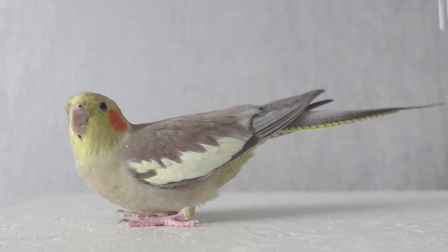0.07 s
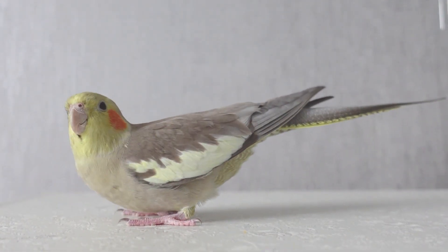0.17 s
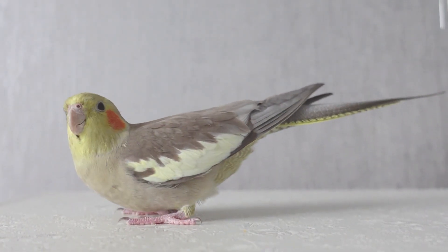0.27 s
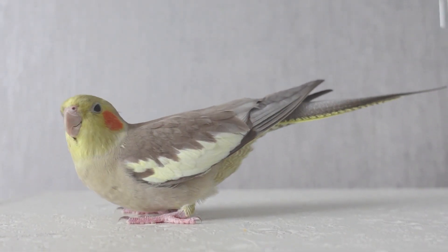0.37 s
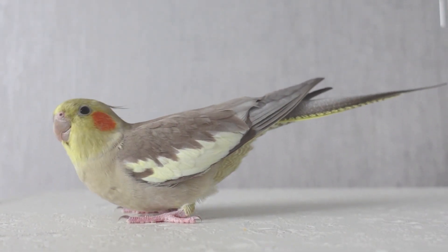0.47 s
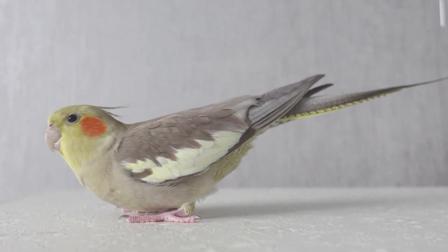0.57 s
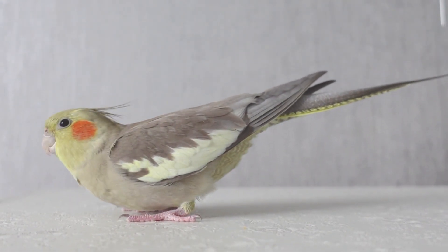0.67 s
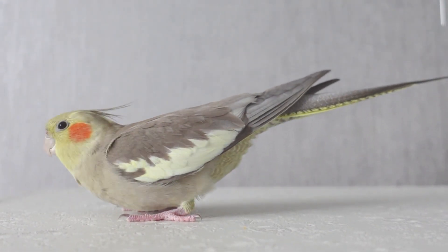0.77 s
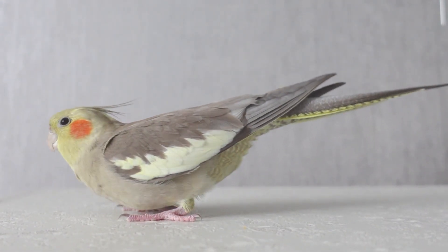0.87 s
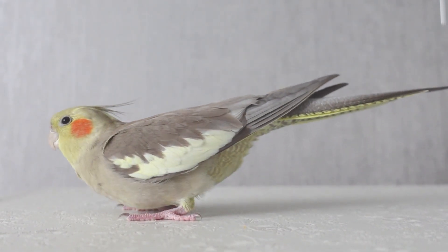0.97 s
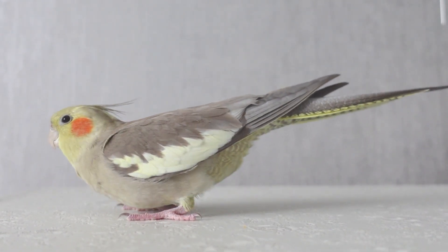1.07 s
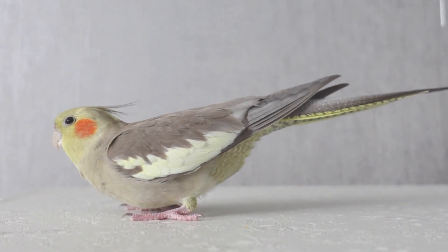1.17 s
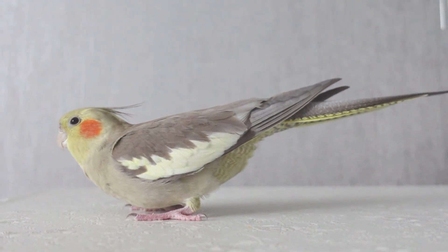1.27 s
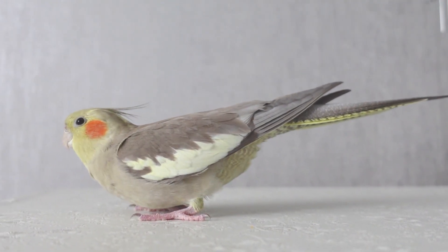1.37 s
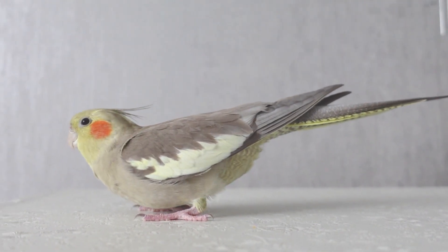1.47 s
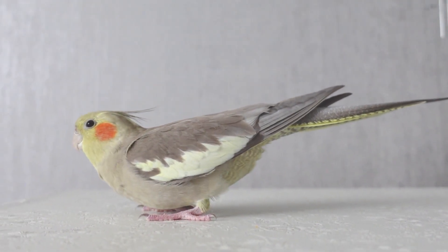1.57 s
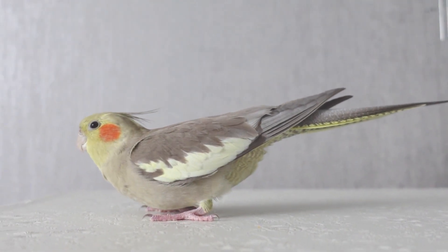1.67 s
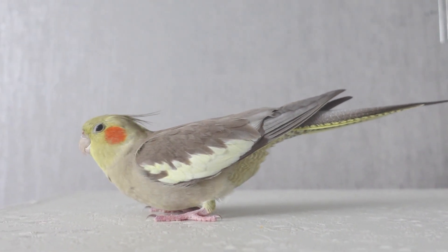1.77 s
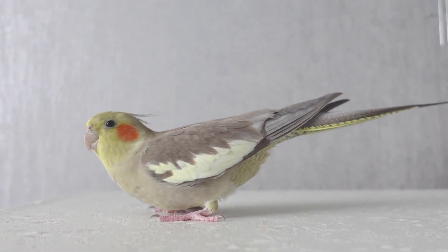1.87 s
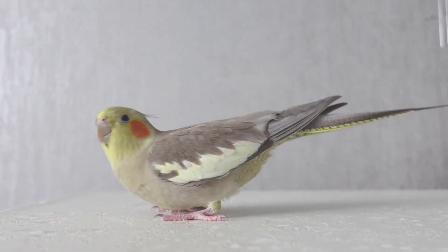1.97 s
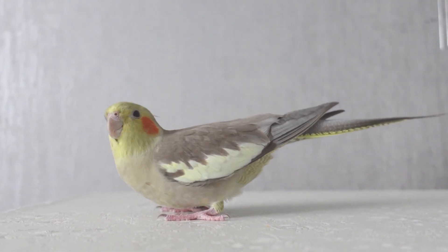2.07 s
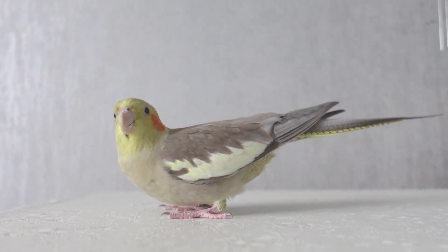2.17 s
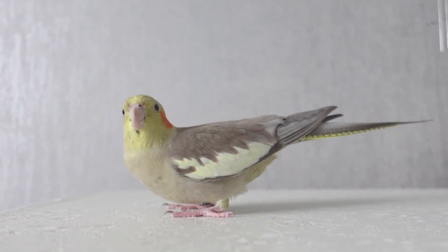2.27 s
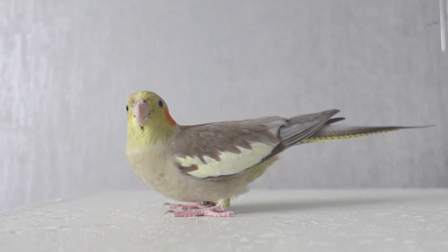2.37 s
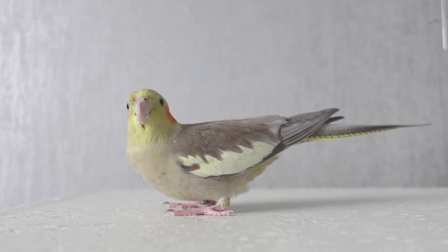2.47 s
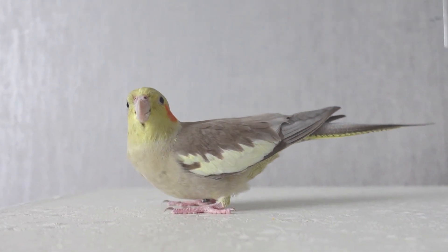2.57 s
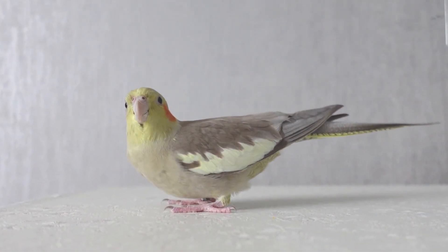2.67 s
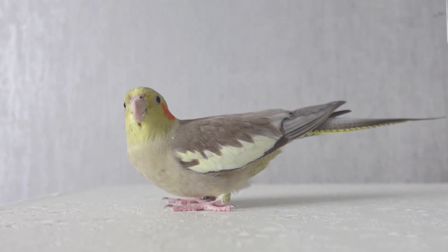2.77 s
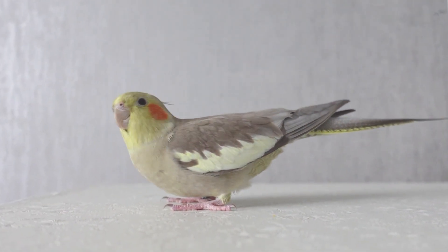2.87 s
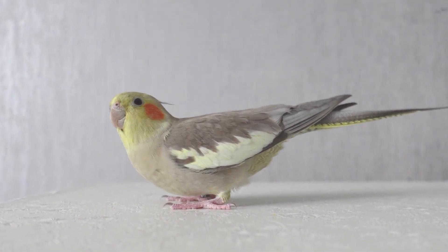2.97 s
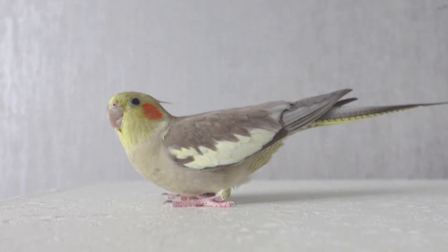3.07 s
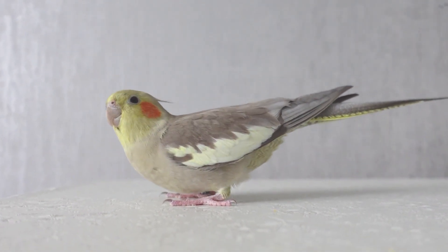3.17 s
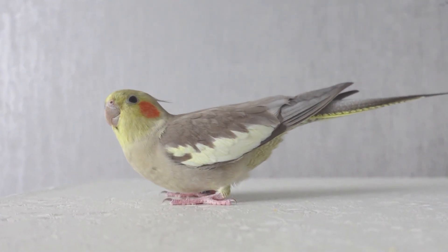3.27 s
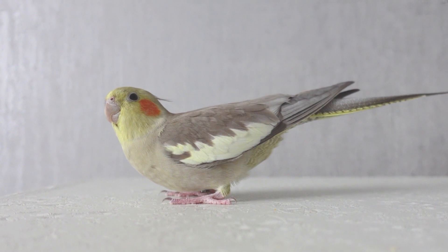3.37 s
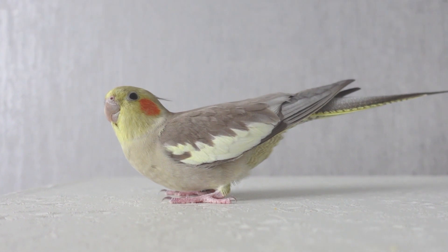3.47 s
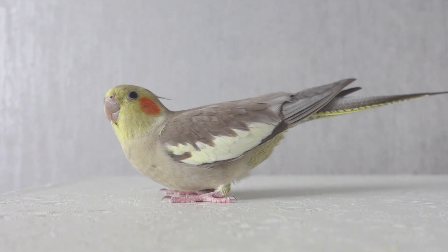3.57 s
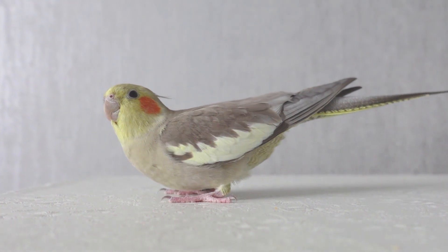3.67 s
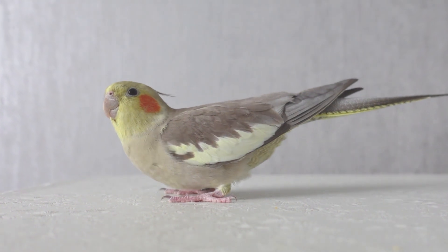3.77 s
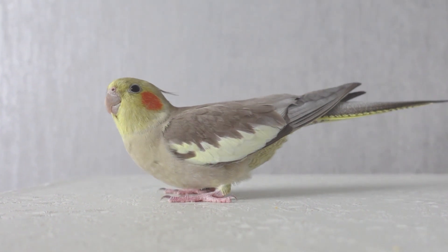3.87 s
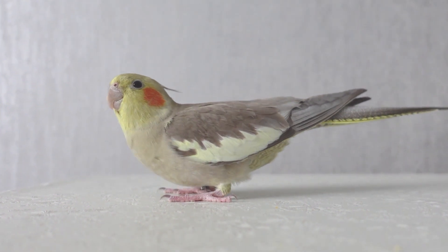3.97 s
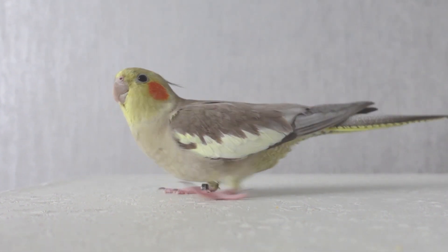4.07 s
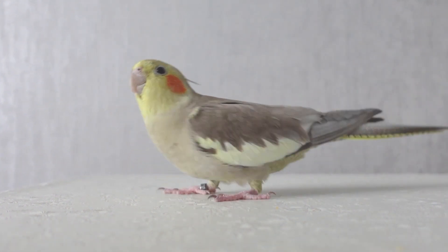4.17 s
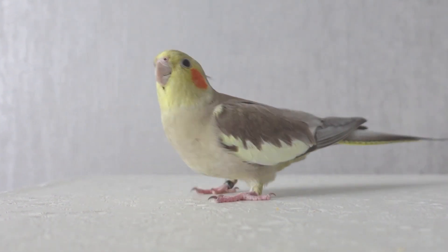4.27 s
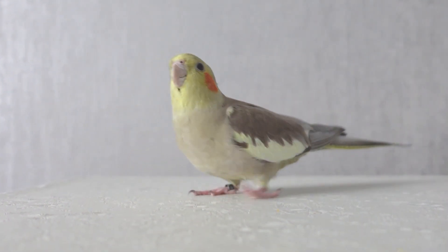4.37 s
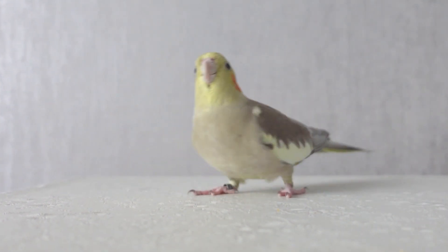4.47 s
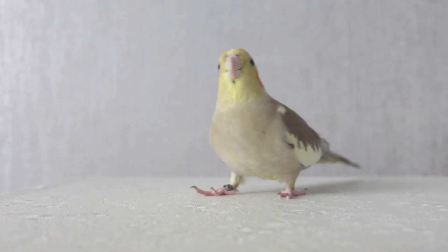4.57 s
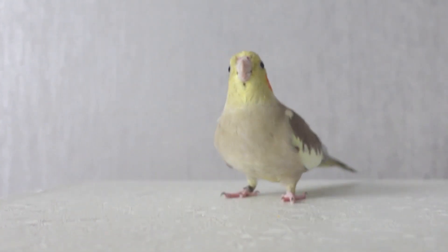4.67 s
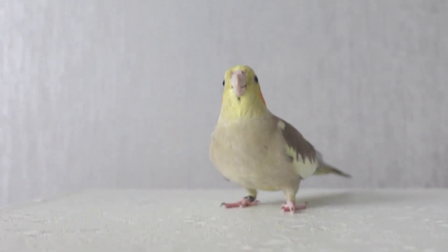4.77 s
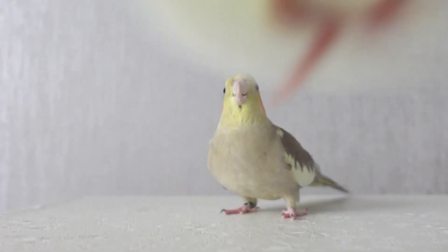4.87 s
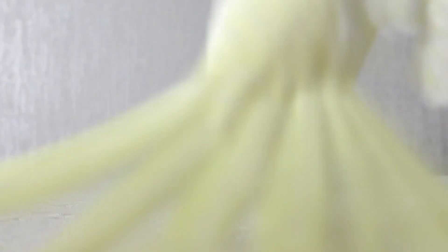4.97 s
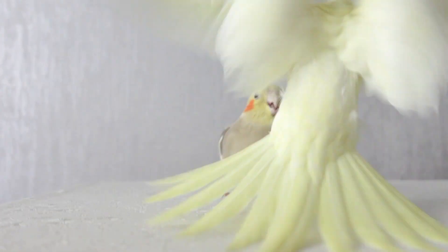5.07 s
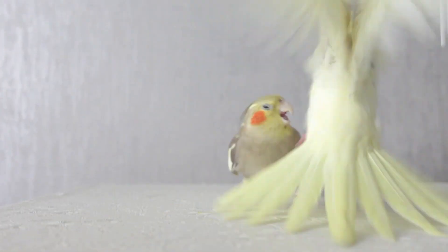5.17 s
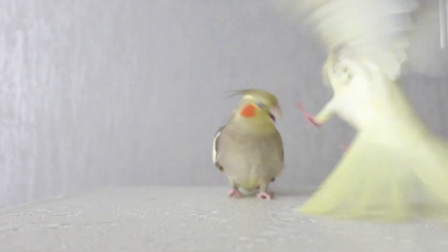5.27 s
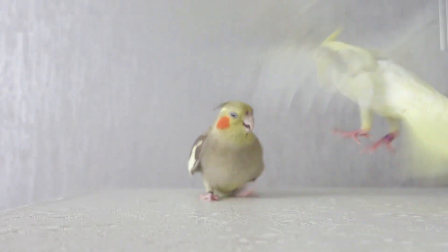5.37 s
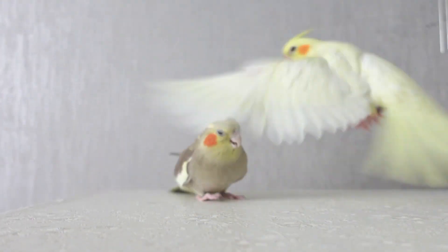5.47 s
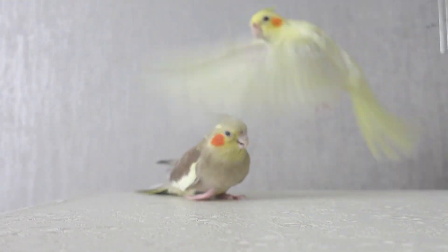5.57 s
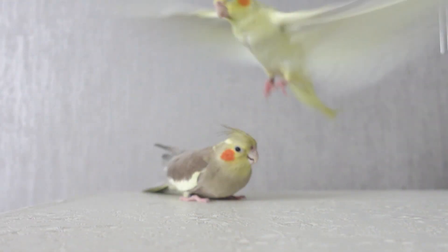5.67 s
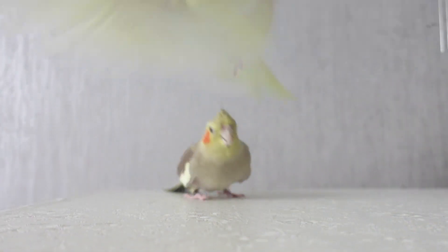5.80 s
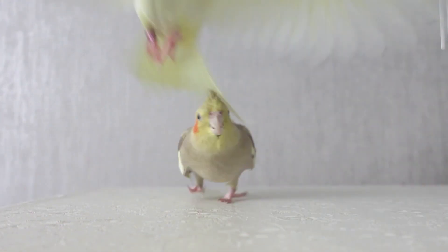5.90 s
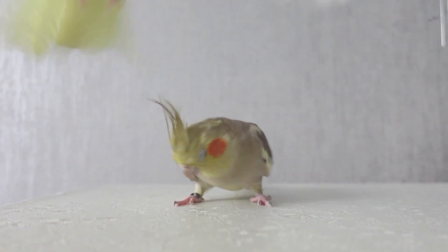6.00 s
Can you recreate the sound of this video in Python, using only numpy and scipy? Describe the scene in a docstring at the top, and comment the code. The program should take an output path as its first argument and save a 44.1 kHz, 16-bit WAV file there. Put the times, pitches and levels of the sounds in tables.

```python
"""Seven short, raspy chirps from a cockatiel on a table in a small room, with faint high clicks.
Feathers rustle and rumble, on a camera and in flight: shaped noise, with a hollow hum from the camera's case.
A second bird flutters in close at about ten wingbeats a second: its feathers swish and snap (noise
bursts), and the downwash of its wings buffets the two microphone ports (deep, lumpy noise).
The chirps are gliding whistles that break into short pulses; a diffuse room tail and soft air noise surround it all."""
import sys
import numpy as np
from scipy import signal
from scipy.fft import rfft, irfft, next_fast_len
from scipy.io import wavfile
from scipy.ndimage import uniform_filter1d

SR = 44100
rng = np.random.default_rng(int(sys.argv[2]) if len(sys.argv) > 2 else 0)


def digitize_waveform(pressure):
    """Quantize a signal to 16-bit integers and store it at the path in sys.argv[1].

    Rows of a 2-D input are taken as channels; values are limited to [-1, 1].
    """
    field = np.atleast_2d(pressure).T
    bounded = np.clip(field, -1, 1)
    quanta = np.round(bounded * 32767).astype(np.int16)
    wavfile.write(sys.argv[1], SR, quanta)


N = 266143
TIME = np.arange(N) / SR

# how alike the two channels are, for close sounds and for rustling: (frequency [Hz], correlation [-1 to 1])
NEAR_LIKENESS = [(100, 0.98), (700, 0.92), (2500, 1), (15000, 0.81)]
RUSTLE_LIKENESS = [(300, 0.067), (2000, 0.15), (15000, 0.23)]
# plumage brushes the camera:
# (middle [s], length [s], relative swish level [dB], relative bump level [dB], left over right [dB])
BRUSHES = [(1.022, 0.052, -57, -72, -8), (1.074, 0.029, -53.5, -69, -9), (1.157, 0.056, -58.5, -73, -2),
           (1.231, .02, -60, -67, -2), (1.293, 0.014, -55, -80, -19), (1.447, 0.018, -54, -77, -8),
           (1.514, 0.063, -56, -65, -2), (1.695, 0.021, -54, -66.5, -4), (2.2, 0.033, -46, -88, -5.5),
           (2.23, 0.012, -40.5, -55, -5), (2.273, 0.019, -69, -53, -1), (2.321, 0.012, -38.5, -41.5, -5.5),
           (2.354, 0.017, -58, -42.5, -8), (2.402, 0.021, -39, -34, -20), (2.421, 0.017, -38, -36.5, -17),
           (2.486, 0.02, -45, -62, -4), (2.528, 0.016, -45, -46.5, -5), (2.632, 0.062, -49.5, -59, -3.5),
           (2.741, 0.061, -55.5, -67, -4), (3.354, 0.026, -51, -95, 0)]
# wingbeats of the arriving bird:
# (middle [s], stroke length [s], relative swish level [dB], left over right [dB])
WINGBEATS = [(4.288, 0.0067, -47, 8), (4.378, 0.021, -32.5, 5), (4.474, 0.025, -33.5, 3.5),
             (4.603, 0.022, -30.5, 3), (4.711, 0.017, -34.5, 3), (4.813, 0.015, -30.5, 3),
             (4.905, 0.033, -26.5, 1), (4.996, 0.027, -21, 0.5), (5.09, 0.035, -36.5, -2),
             (5.321, 0.022, -44, -2), (5.418, 0.011, -45, 2.5), (5.51, 0.012, -36.5, 4),
             (5.624, 0.024, -40, 0), (5.73, .012, -53, -9), (5.833, 0.02, -40, 0),
             (5.938, 0.06, -40.5, -0.5), (6.026, 0.042, -39.5, -1)]


def from_db(db):
    """Decibels to gain."""
    return 10 ** (np.asarray(db) / 20)


def rms_one(x):
    """Scale to an average power of 1."""
    return x / np.sqrt(np.mean(x ** 2) + 1e-20)


def at_hz(points, hz):
    """Read a table at any frequency, with straight lines over log frequency."""
    table_hz, value = np.transpose(points)
    return np.interp(np.log(hz + 1e-3), np.log(table_hz), value)


def noise(colour, likeness):
    """Stereo noise with a given spectrum and likeness of the channels; rms 1."""
    size = next_fast_len(N)
    hz = np.arange(size // 2 + 1) * SR / size
    alike = np.clip(at_hz(likeness, hz), -1, 1)
    mid, side = rfft(rng.standard_normal((2, size)))
    # the shared part is equal in both channels, the other part has opposite signs
    pair = np.sqrt(1 + alike) * mid + np.sqrt(1 - alike) * side * [[1], [-1]]
    spectrum = pair * from_db(at_hz(colour, hz)) * (hz > 20)
    return rms_one(irfft(spectrum, size)[:, :N])


def drift(rate):
    """A random wander with a spread of 1, given a new target "rate" times a second."""
    knots = rng.standard_normal(N // 8)
    return rms_one(np.interp(TIME * rate, np.arange(len(knots)), knots))


def panned(db):
    """Left and right gains for a level difference; above 0 dB the left is louder."""
    pair = from_db(np.array([db, -db]).reshape(2, -1) / 2)
    return pair / np.sqrt(np.mean(pair ** 2, axis=0))


def swell(centre, length, steepness):
    """A rounded burst with soft skirts; its length is measured at half power."""
    return 1 / np.sqrt(1 + np.abs(2 * (TIME - centre) / length) ** steepness)


def held(start, length, attack_s, release_s):
    """Rise before the start, hold, then fall; attack and release are the times for 20 dB."""
    outside = np.maximum(start - TIME, 0) / attack_s + np.maximum(TIME - start - length, 0) / release_s
    return from_db(-20 * np.minimum(outside, 10))


def steadied(x, window_s):
    """Even out the power of a noise so that its envelope sets the level."""
    power = uniform_filter1d(np.mean(x ** 2, axis=0), max(int(window_s * SR), 8))
    return x / np.sqrt(np.maximum(power, 1e-3))


def resonance(x, hz, width_hz):
    """A two-pole band-pass that rings at one pitch, with gain 1 at its top."""
    r = np.exp(-np.pi * width_hz / SR)
    feedback = [1, -2 * r * np.cos(2 * np.pi * hz / SR), r * r]
    return signal.lfilter(np.array([1, 0, -1]) * (1 - r * r) / 2, feedback, x)


def air(level_db=-70):
    """Soft, steady air noise beneath everything."""
    # spectrum: (frequency [Hz], level [dB])
    air_colour = [(18, -78), (30, -51), (88, -12.5), (127, -15.5), (258, -11.5), (838, -9.5), (981, -13.5),
                  (1530, -15), (2100, -16.5), (2270, -18.5), (15800, -27.5)]
    return from_db(level_db) * noise(air_colour, RUSTLE_LIKENESS)


def rustling(hiss_db=4.0, rub_db=0., patchy_db=2.26, grain_db=0.5):
    """Soft feather rustle and low rumble, from plumage on the camera and from the bird flying close."""
    # long rustles: (full from [s], length [s], attack [s per 20 dB], release [s per 20 dB],
    # relative hiss level [dB], relative rumble level [dB], left over right [dB])
    rustles = [(.01, 0.027, 0.071, 0.5, -73, -92, -3), (0.908, 1.15, 0.06, .45, -67, -78.5, -4),
               (2.256, 0.19, 0.055, 0.34, -52.5, -47.5, -4.5), (3.659, 1.11, 0.5, 0.24, -50.5, -52.5, 2.5),
               (4.872, 0.16, 0.15, 0.3, -48.5, -46, 1), (5.33, 0.34, 0.47, 0.34, -53.5, -44.5, -3.5)]
    # spectra of hiss and rumble: (frequency [Hz], level [dB])
    rustle_colour = [(200, -40), (600, 2.5), (1200, -3), (2500, 2), (4500, 1), (7000, -0.5), (9500, 1.5),
                     (13000, -2), (16000, -7)]
    rumble_colour = [(25, -21), (65, -1), (130, -1.5), (200, -1.5), (320, -9), (480, -6), (750, -10.5),
                     (1200, -14.5), (2500, -21)]
    ease_db_per_s = 1.5  # every rustle slackens as it goes on
    rumble_growth = 1.16  # dB of rumble for each dB of hiss as a rustle swells
    rumble_onset = 0.42  # share of full strength at which the rumble sets in
    hiss_power, rumble_power, opening = np.zeros((2, N)), np.zeros(N), np.zeros(N)
    for s, length, attack_s, release_s, db, rumble_db, pan_db in rustles:
        easing = from_db(-ease_db_per_s * np.clip(TIME - s, 0, length))
        strength = held(s, length, attack_s, release_s) * easing
        # from full strength on, the rumble stays open until the release time is over
        staying = (TIME > s) & (TIME < s + length + release_s)
        opening = np.maximum(opening, np.maximum(strength, staying))
        hiss_power += (from_db(db + hiss_db) * strength * panned(pan_db)) ** 2
        rumble_power += (from_db(rumble_db + rub_db) * strength ** rumble_growth) ** 2
    patches = rms_one(from_db(patchy_db * drift(55) + grain_db * drift(1200)))
    hiss = np.sqrt(hiss_power) * noise(rustle_colour, RUSTLE_LIKENESS)
    rumble = np.sqrt(rumble_power) * noise(rumble_colour, NEAR_LIKENESS)
    rumble_gate = np.clip((opening - rumble_onset) * 4, .15, 1)
    return patches * (hiss + rumble * rumble_gate)


def slap(top_hz, length_s=0.00321, start=1.432, end=0.11, throat_hz=1250, throat_width_hz=260, throat_db=-6.0):
    """One pulse of the syrinx (voice organ): a few cycles dive in pitch and leave the throat ringing."""
    u = np.linspace(0, 1, int(length_s * SR))
    # start and end are multiples of the chirp's top pitch
    phase = 2 * np.pi * np.cumsum(top_hz * (start + (end - start) * u ** 1.53)) / SR
    pulse = np.pad(np.sin(phase) * np.sin(np.pi * u ** 1.32) ** 2, len(u))
    pulse = signal.sosfilt(signal.butter(2, 300, "high", fs=SR, output="sos"), pulse)
    return pulse + from_db(throat_db) * resonance(pulse, throat_hz, throat_width_hz)


def chirps(pulse_hz=330, jitter=0.27, arch=0.244, rasp_db=0., onset_db=-6, rasp_start=0.16):
    """An arched whistle breaks into uneven pulses; returns the voice and its overtones."""
    # (start [s], length [s], top pitch [Hz], final pitch [Hz], relative level [dB],
    # where the rasp ends [share of chirp], rasp depth [0-1])
    chirp_rows = [(0.1, 0.03, 2123, 1610, -42.5, 0.4, 0.15), (.394, .042, 2538, 1900, -44, 0.72, 0.7),
                  (2, 0.044, 2250, 1630, -45, 0.71, 1), (2.21, 0.041, 2337, 1350, -38.5, 0.5, 1),
                  (3.055, 0.0324, 2310, 1590, -44.5, 0.93, 1), (3.236, 0.032, 2450, 1730, -40, 0.86, .55),
                  (3.414, 0.037, 2290, 1410, -42.5, 1, 1)]
    # overtones, beamed past the microphone into the room: (multiple of the pitch, relative level [dB])
    overtone_rows = [(2, -20.5), (3, -38)]
    voice, overtones = np.zeros((2, N))
    for s, length, top_hz, final_hz, db, rasp_end, depth in chirp_rows:
        u = np.linspace(0, 1, int(length * SR))
        # the pitch climbs to its top halfway, then falls
        sag_hz = np.where(u < .5, arch * top_hz, top_hz - final_hz)
        phase = 2 * np.pi * np.cumsum(top_hz - sag_hz * (2 * u - 1) ** 2) / SR
        gaps = np.exp(jitter * rng.standard_normal(40))
        slap_times = (np.cumsum(gaps) * SR / pulse_hz).astype(int)
        pulses = np.bincount(slap_times - slap_times[0], minlength=len(u))[:len(u)]
        rasp = from_db(rasp_db) * rms_one(np.convolve(pulses, slap(top_hz), "same"))
        rasp_window = np.clip(.5 + 10 * np.minimum(u - rasp_start, rasp_end - u), 0, 1)
        rough = np.clip(depth, 0, 1) * rasp_window
        fades = np.clip(u * 30, 0, 1) * np.clip((1 - u) * 7, 0, 1)
        effort = from_db(db + onset_db * np.clip(1 - 2 * u, 0, 1)) * fades
        span = slice(int(s * SR), int(s * SR) + len(u))
        # some of the whistle always carries on through the rasp
        whistle = np.sqrt(2 - 1.6 * rough) * np.sin(phase)
        voice[span] += effort * (np.sqrt(rough) * rasp + whistle)
        overtones[span] += effort * sum(from_db(g) * np.sin(round(k) * phase) for k, g in overtone_rows)
    return voice, overtones


def pips(ring_hz=7700, width_hz=600, t60_s=0.029):
    """Faint clicks from the perched bird: each is a short scratch with one high resonance."""
    # (start [s], relative level [dB])
    pip_rows = [(0.12, -56), (2.048, -60), (3.062, -55), (3.203, -63)]
    scratch = sum(from_db(db - 60 * np.clip(TIME - s, 0, 1) / t60_s) * (TIME > s) for s, db in pip_rows)
    return scratch * rms_one(resonance(rng.standard_normal(N), ring_hz, width_hz))


def room(x, t60_s=0.45, wall_s=0.029, wall_gain=0.25):
    """Sound returns as a fading, diffuse tail and one distinct echo from the far wall."""
    # spectrum of the tail: (frequency [Hz], level [dB])
    room_colour = [(150, 8), (600, 8), (2000, 5), (5000, 8), (8000, -0.5), (16000, -30)]
    tail = noise(room_colour, [(100, 0.38), (2000, 0.67), (8000, .1)])[:, :SR]
    tail = tail * from_db(-60 * TIME[:SR] / t60_s) * np.clip(TIME[:SR] / 0.004, 0, 1)
    tail = tail / np.sqrt(np.sum(tail ** 2) / 2)
    tail[:, int(wall_s * SR)] += wall_gain
    return signal.fftconvolve(x[None], tail, axes=1)[:, :N]


def strokes(rows, hiss_db, flutter_db, flutter_growth, steepness, grain_db, sway_db, sway_per_s=220):
    """Feathers sweep past, barbs catching in a fine rasp; harder strokes make the vanes flutter more."""
    # spectra: (frequency [Hz], level [dB])
    hiss_colour = [(200, 3.5), (700, 1.5), (1500, -3), (3500, 0.5), (6000, 4.5), (9500, 6), (13000, 4),
                   (16000, 0.5)]
    flutter_colour = [(400, -1), (900, 6), (1800, 9.5), (3500, 8.5), (5000, 1), (9000, -20), (16000, -45)]
    # likeness of the channels: (frequency [Hz], correlation [-1 to 1])
    stroke_likeness = [(700, 1), (2500, 0.76), (5000, 0.63), (15000, 0.48)]
    hiss, flutter = np.zeros((2, N)), np.zeros((2, N))
    hardest_db = max(row[2] for row in rows)
    for s, length, db, *_, pan_db in rows:
        sweep = (swell(s, length, steepness) * panned(pan_db)) ** 2
        growth_db = flutter_growth * (db - hardest_db)
        hiss += from_db(db + hiss_db) ** 2 * sweep
        flutter += from_db(db + flutter_db + growth_db) ** 2 * sweep
    # the swish wavers quickly and at random between left and right
    barbs = rms_one(from_db(grain_db * drift(900))) * panned(sway_db * drift(sway_per_s))
    hissing = np.sqrt(hiss) * noise(hiss_colour, stroke_likeness)
    fluttering = np.sqrt(flutter) * noise(flutter_colour, stroke_likeness)
    return barbs * (hissing + fluttering)


def bumps(swing_db=-2.5, rumble_db=-7.0, knock_db=-5.5, sharpness=4.7):
    """Brushes and wingbeats bring a few slow swings of pressure and a rumble; quicker swings knock more."""
    # spectrum of the rumble: (frequency [Hz], level [dB])
    bump_colour = [(25, -23), (55, 8.5), (100, 11.5), (200, -1.5), (400, -7), (900, -14), (2000, -51)]
    lag_s = 0.01176  # the middle of the swing follows the middle of the stroke
    brush_hz, brush_s = 127.4, 0.03
    wing_hz, wing_s = 76, 0.039
    wing_push_db, push_limit_db = -4.5, -38  # push relative to the swish table, and its ceiling
    passing_s, passed_loss_db = 5.05, 6.5  # once past, the bird pushes its air away from the ports
    events = [(s, brush_s, db, brush_hz) for s, _, _, db, _ in BRUSHES]
    for s, _, db, _ in WINGBEATS:
        push_db = min(db + wing_push_db, push_limit_db) - passed_loss_db * (s > passing_s)
        events.append((s, wing_s, push_db, wing_hz))
    swing, push, firm = np.zeros((3, N))
    for s, length, db, hz in events:
        age = TIME - s - lag_s
        shape = from_db(db) * np.exp(-sharpness * np.minimum((age / length) ** 2, 20))
        swing += shape * np.sin(2 * np.pi * hz * age)
        push += shape
        firm += shape * min(hz / 100, 1.4) ** 3
    rumble = steadied(noise(bump_colour, [(100, 1.0), (1000, 0.95)]), window_s=0.0091)
    knock_colour = [(120, 3.5), (220, 1.5), (430, -2.0), (650, -19), (1300, -15.5), (3000, -34)]
    knock = steadied(noise(knock_colour, NEAR_LIKENESS), window_s=0.011)
    return from_db(swing_db) * swing + from_db(rumble_db) * push * rumble + from_db(knock_db) * firm * knock


def snaps(tick_db=-2.0, slap_db=-1.0, t60_s=0.015):
    """A quill scrapes for an instant and lets go; a wing tip landing flat adds a duller slap."""
    # (start [s], relative level [dB], slap against tick before the mix [dB], contact time [s])
    snap_rows = [(2.324, -40.5, -7, .002), (2.4017, -38.5, 9, 0.00078), (4.799, -34.5, 2.5, 0.0017),
                 (4.885, -28, 4, 0.0073), (4.962, -23, -16, .001), (5.0769, -25.5, 6.5, 0.0034),
                 (5.2233, -37, -1.5, 0.0012), (5.304, -38, 1, .001), (5.347, -41.5, 6.5, .0026),
                 (5.4338, -36, 6, 0.00075), (5.4601, -27, -9, 0.00049), (5.522, -36, 3.5, 0.0041),
                 (5.575, -35.5, -5.5, 0.0019), (5.614, -32, 4.5, 0.0018), (6.0019, -34.5, -29, 0.0012),
                 (6.025, -32, -30, 0.0038)]
    # spectra: (frequency [Hz], level [dB])
    tick_colour = [(800, -22), (1700, -8.5), (2700, -4.5), (4000, 1.5), (5500, 4.5), (8000, 1.5),
                   (11000, 2), (16000, -12)]
    slap_colour = [(100, -17), (400, 6), (1000, 8), (2000, -1), (4000, -3), (9000, -31)]
    tick, flat = np.zeros(N), np.zeros(N)
    for s, db, flat_db, contact in snap_rows:
        at = int(s * SR)
        age = TIME[:min(N - at, SR // 4)]
        # full level during contact, then a fast decay
        burst = from_db(db - 60 * np.maximum(age - contact, 0) / t60_s)
        tick[at:at + len(age)] += from_db(tick_db) * burst
        flat[at:at + len(age)] += from_db(slap_db + flat_db) * burst
    crack = steadied(noise(tick_colour, [(1000, 0.94), (15000, 0.93)]), window_s=0.0028)
    thud = steadied(noise(slap_colour, NEAR_LIKENESS), window_s=0.00215)
    return tick * crack + flat * thud


def hollow(level_db=-39):
    """Sliding plumage sets the case humming: friction noise rings in its resonances."""
    # resonances of the case: (frequency [Hz], width [Hz], relative level [dB])
    case_rows = [(63.4, 21, -17), (281, 41, -3), (394, 65, 2), (470, 130, -5), (753, 87, -6),
                 (1020, 1330, -14.5)]
    contact = held(3.6, 0.49, attack_s=0.11, release_s=0.17)
    force = contact * swell(3.785, 0.04, steepness=1.5)
    friction = noise([(100, 0), (3000, 0)], [(300, 0.99), (1500, 0.86)])
    body = np.zeros((2, N))
    for k, (hz, width, db) in enumerate(case_rows):
        body += (-1) ** k * from_db(db) * resonance(friction, hz, width)  # signs alternate
    return from_db(level_db) * force * rms_one(body)


def downwash(gust_db=1.0, eddy_db=4.5, lumpy_db=2.9, eddy_lumpy_db=4.0, lumps_per_s=90):
    """Gusts buffet the ports and leave a wake; fast eddies come and go with the lumps in the flow."""
    # gusts that reach the ports:
    # (full from [s], length [s], relative level [dB], relative level of the fast eddies [dB])
    gusts = [(4.673, 0.063, -20.5, -37.5), (4.756, 0.018, -17, -36), (4.826, 0.0068, -20, -25.5),
             (4.846, 0.065, -24.5, -45), (4.923, 0.015, -20.5, -26), (4.953, .011, -17.5, -24.5),
             (5.066, 0.081, -24.5, -29), (5.128, 0.01, -20.5, -23), (5.154, 0.015, -23, -29),
             (5.168, 0.033, -25.5, -42.5), (5.205, 0.14, -37.5, -70), (5.396, 0.09, -29, -44),
             (5.508, 0.038, -28.5, -67), (5.577, 0.0038, -28.5, -69), (5.62, 0.046, -30, -52),
             (5.677, 0.019, -45, -64)]
    # spectra: (frequency [Hz], level [dB])
    gust_colour = [(25, -45), (50, -16.5), (95, -2.5), (180, 0), (300, -1), (450, -6.5), (650, -16.5),
                   (900, -25), (1400, -72), (2500, -77)]
    eddy_colour = [(150, -35), (400, 6.5), (750, -1), (1100, -11), (1600, -20), (3000, -34.5), (6000, -44),
                   (16000, -63)]
    # likeness of the two ports: (frequency [Hz], correlation [-1 to 1])
    port_likeness = [(50, .9), (120, 0.31), (300, 0.23), (800, -0.12), (2000, 0.24)]
    attack_s, release_s = 0.0093, 0.012  # time for 20 dB
    wake_db, wake_release_s = -14, 0.22  # the air keeps swirling after each gust
    slow, fast = np.zeros(N), np.zeros(N)
    for s, length, db, fast_db in gusts:
        puff = held(s, length, attack_s, release_s)
        wake = from_db(wake_db) * held(s, length, attack_s, wake_release_s)
        slow += from_db(db + gust_db) ** 2 * (puff ** 2 + wake ** 2)
        fast += (from_db(fast_db + eddy_db) * puff) ** 2
    lumps = np.clip(drift(lumps_per_s), -2, 2)
    buffet = steadied(noise(gust_colour, port_likeness), window_s=0.0144) * from_db(lumpy_db * lumps)
    eddies = steadied(noise(eddy_colour, port_likeness), window_s=0.0086) * from_db(eddy_lumpy_db * lumps)
    return np.sqrt(slow) * buffet + np.sqrt(fast) * eddies


def crackle(tick_db=-46.5, spread_db=9.5, t60_s=0.013):
    """Tiny dry ticks at random times, a crackling grain in the feather rustle."""
    # (start [s], end [s], average rate [ticks per s])
    start, end, per_s = (5.29, 5.72, 61)
    born = (rng.random(N) < per_s / SR) & (TIME > start) & (TIME < end)
    sizes = born * from_db(tick_db + spread_db * np.clip(rng.standard_normal(N), -2, 1))
    decay = signal.lfilter([1], [1, -from_db(-60 / (t60_s * SR))], sizes + 1e-18)
    return decay * noise([(1500, -4.5), (4000, 7), (8000, 13), (16000, -27)], NEAR_LIKENESS)


def scene(chirp_room_db=-11.0, wing_room_db=-23.0, pip_room_db=0.):
    """The chirps come from across the table; the wings are close and nearly dry."""
    voice, overtones = chirps()
    clicks = pips()
    wings = strokes(WINGBEATS, hiss_db=-4.0, flutter_db=-5.0, flutter_growth=0.95,
                    steepness=4.44, grain_db=3.0, sway_db=1.0)
    brushes = strokes(BRUSHES, hiss_db=-3.0, flutter_db=-6.0, flutter_growth=1.0,
                      steepness=3.6, grain_db=2.0, sway_db=7.5)
    feathers = wings + brushes + snaps() + crackle()
    # the overtones are heard only by way of the room
    far = from_db(chirp_room_db) * (voice + overtones) + from_db(pip_room_db) * clicks
    echo = room(far + from_db(wing_room_db) * feathers.mean(axis=0))
    perched = voice * panned(db=1.5) + from_db(-6.5) * clicks
    return perched + feathers + rustling() + bumps() + hollow() + downwash() + echo + air()


def record(dry):
    """A steep low-pass filter removes the treble above 15.75 kHz."""
    return signal.sosfilt(signal.ellip(10, .2, 80, 15750, fs=SR, output="sos"), dry)


dry = scene()
out = record(dry)
digitize_waveform(out)
```